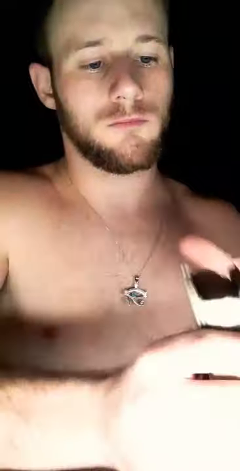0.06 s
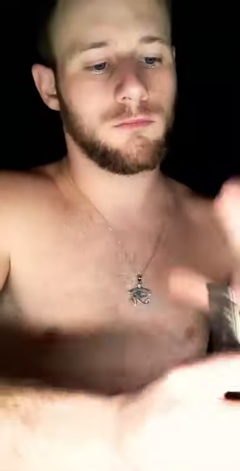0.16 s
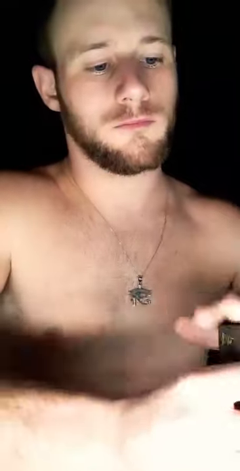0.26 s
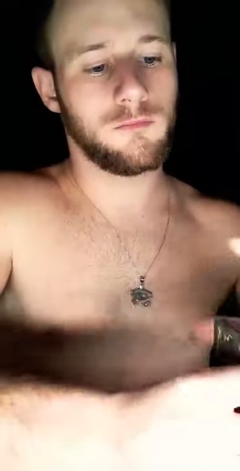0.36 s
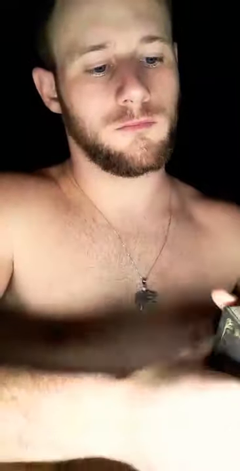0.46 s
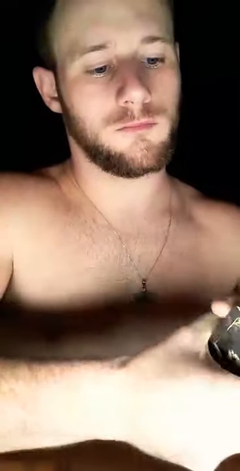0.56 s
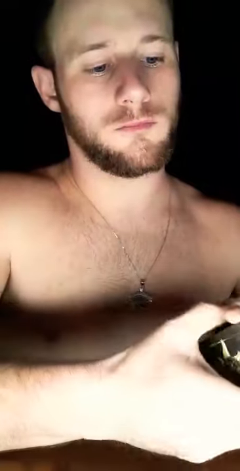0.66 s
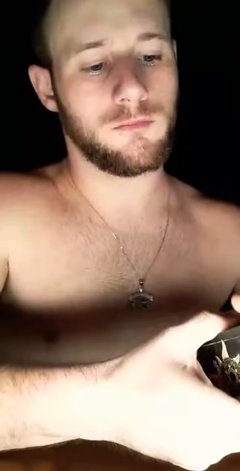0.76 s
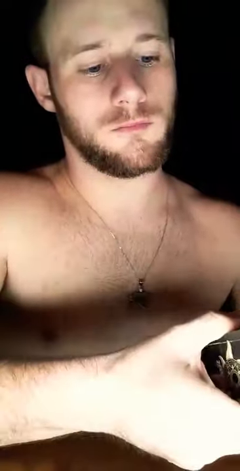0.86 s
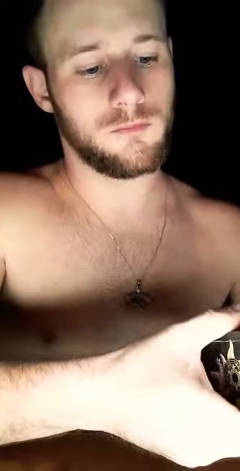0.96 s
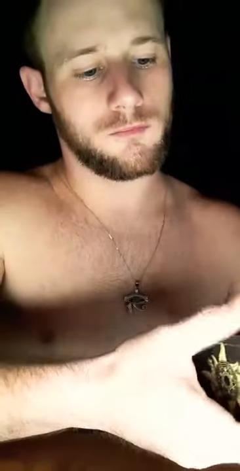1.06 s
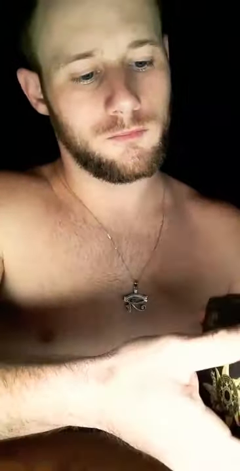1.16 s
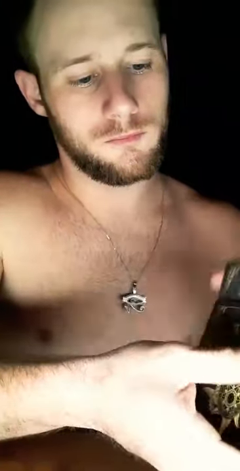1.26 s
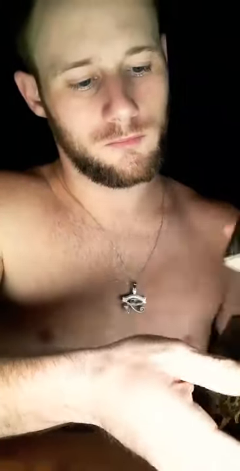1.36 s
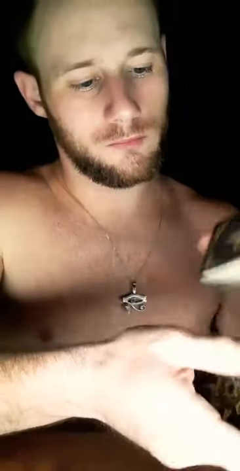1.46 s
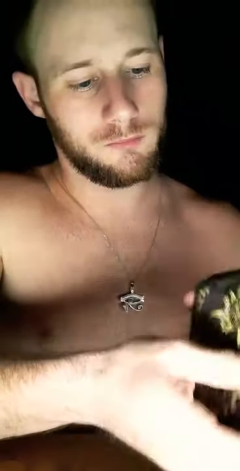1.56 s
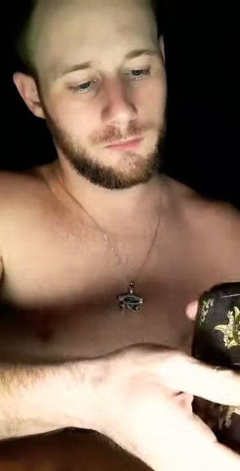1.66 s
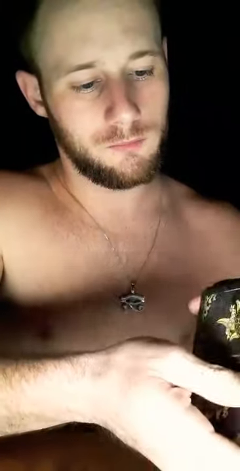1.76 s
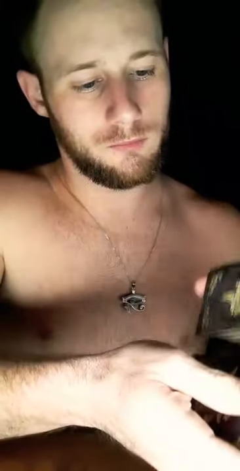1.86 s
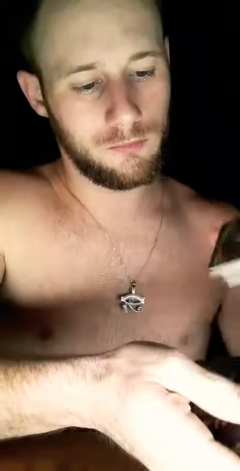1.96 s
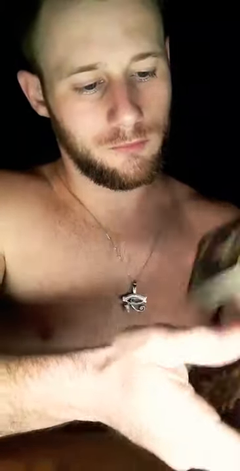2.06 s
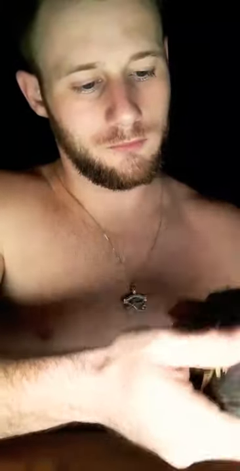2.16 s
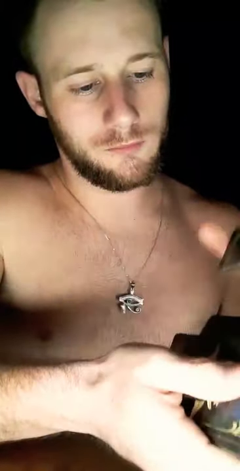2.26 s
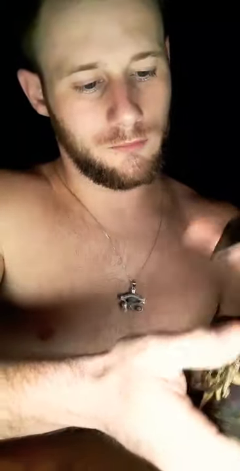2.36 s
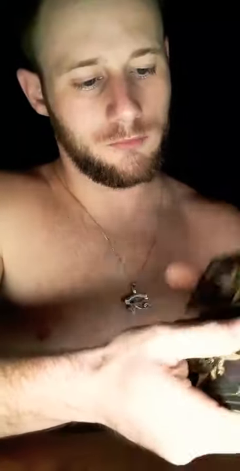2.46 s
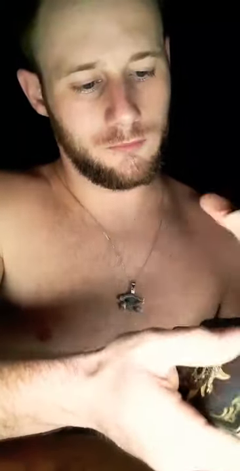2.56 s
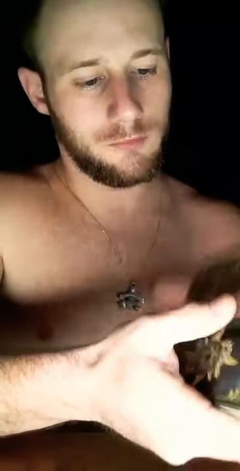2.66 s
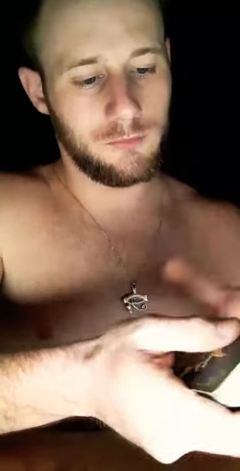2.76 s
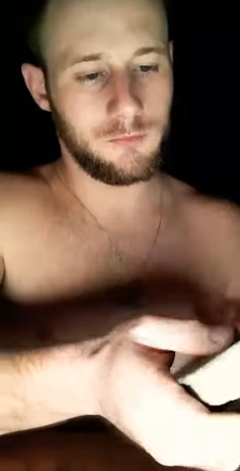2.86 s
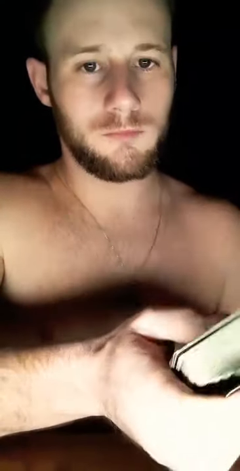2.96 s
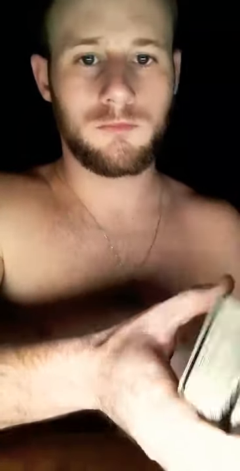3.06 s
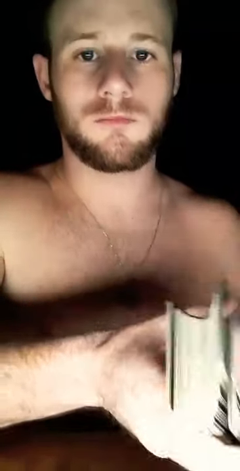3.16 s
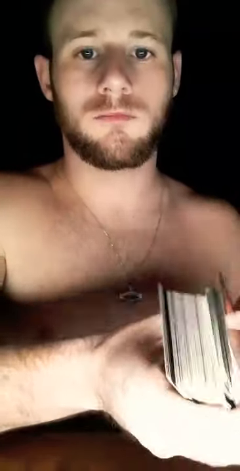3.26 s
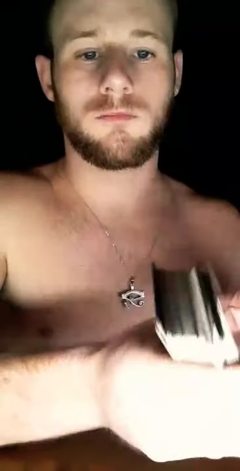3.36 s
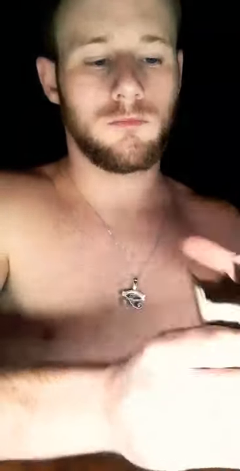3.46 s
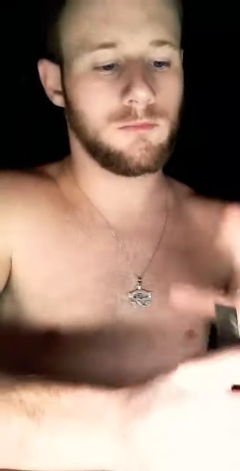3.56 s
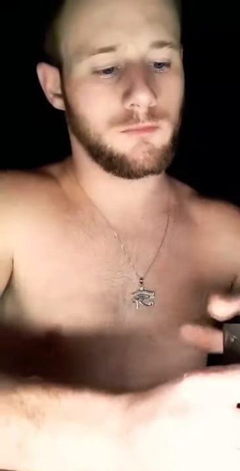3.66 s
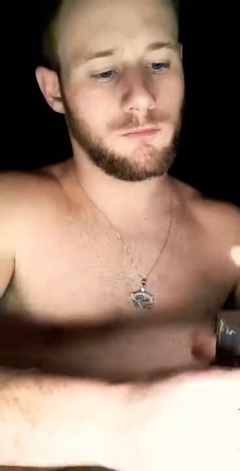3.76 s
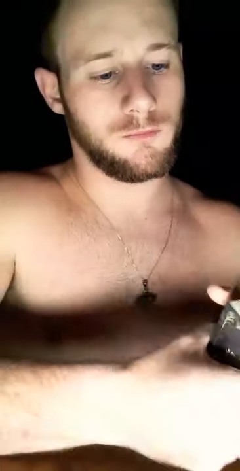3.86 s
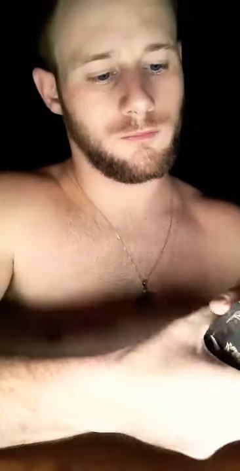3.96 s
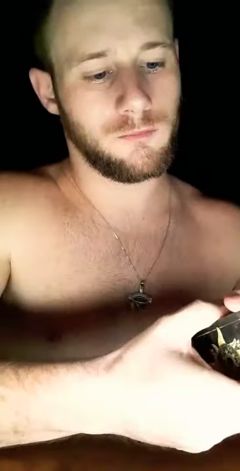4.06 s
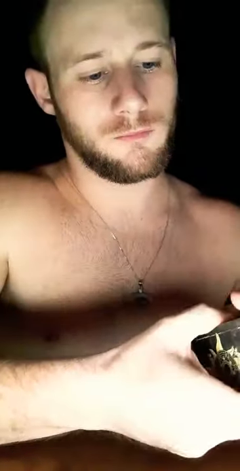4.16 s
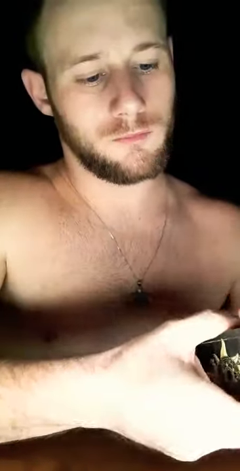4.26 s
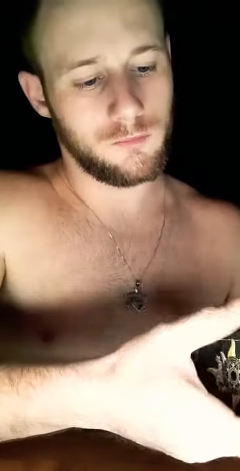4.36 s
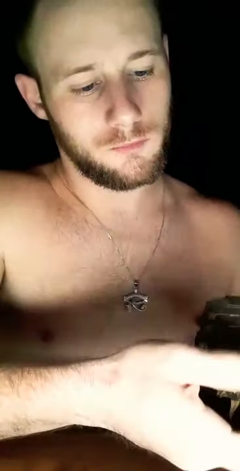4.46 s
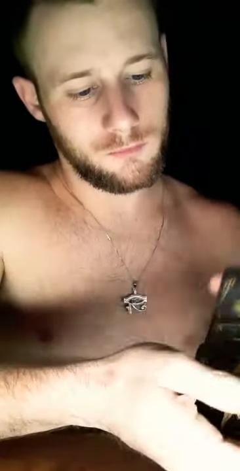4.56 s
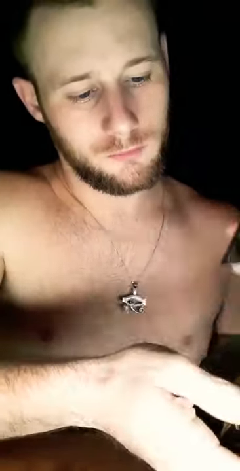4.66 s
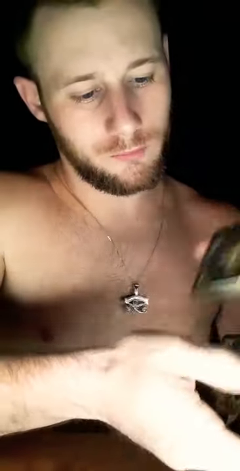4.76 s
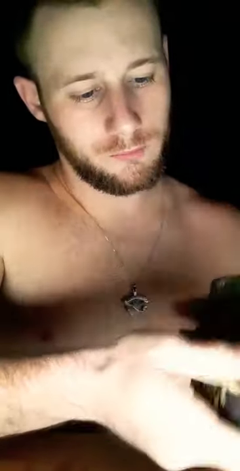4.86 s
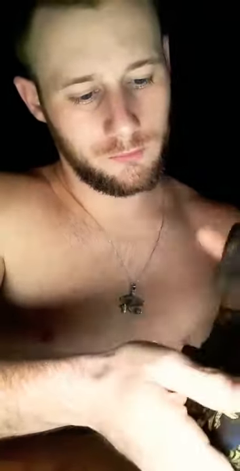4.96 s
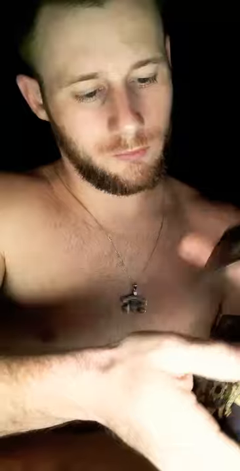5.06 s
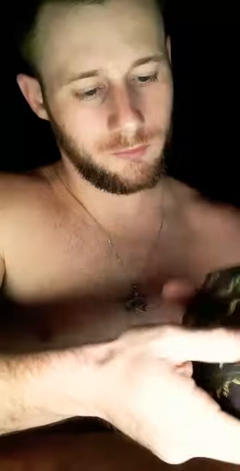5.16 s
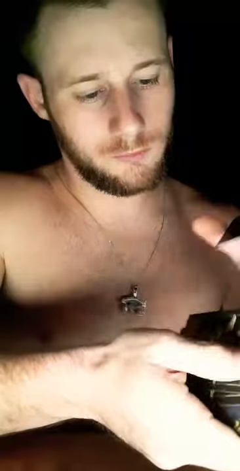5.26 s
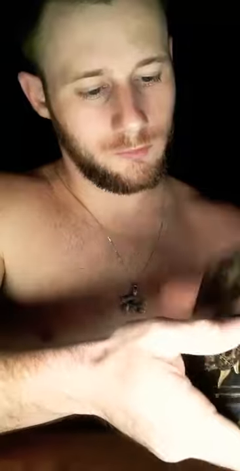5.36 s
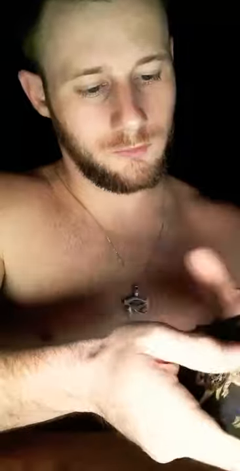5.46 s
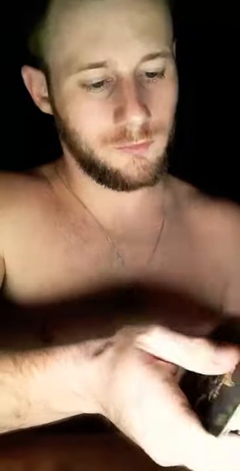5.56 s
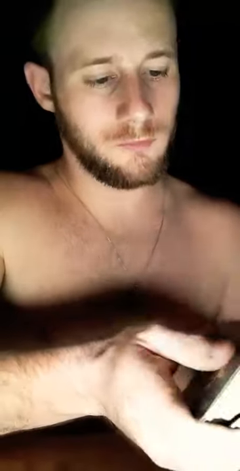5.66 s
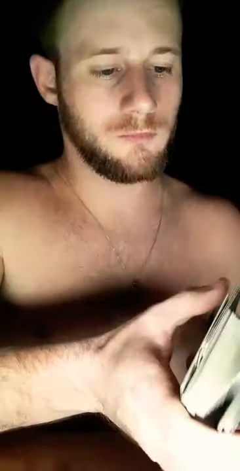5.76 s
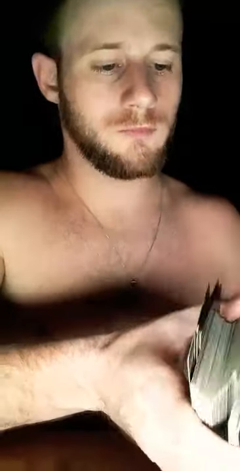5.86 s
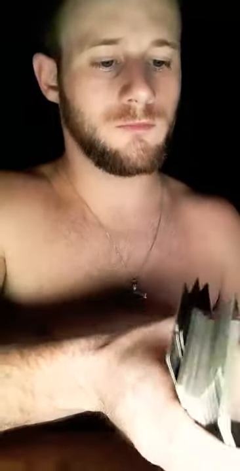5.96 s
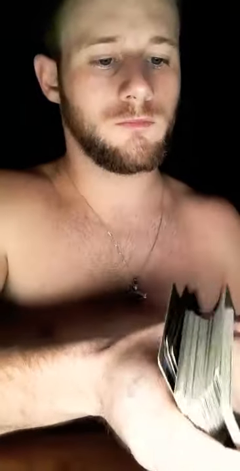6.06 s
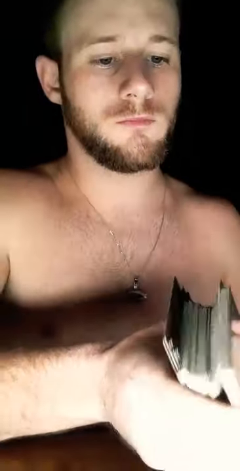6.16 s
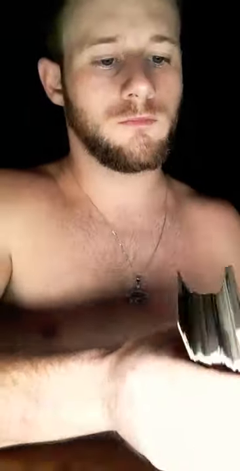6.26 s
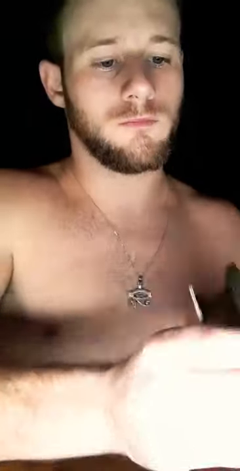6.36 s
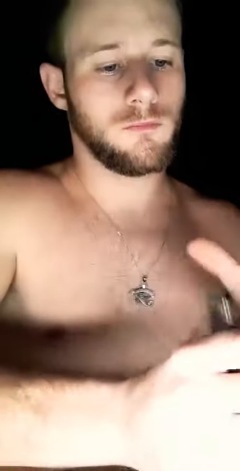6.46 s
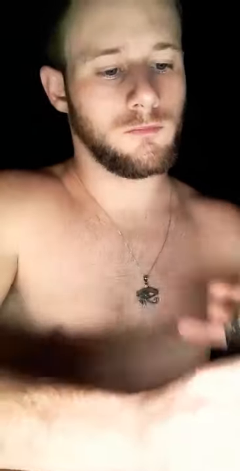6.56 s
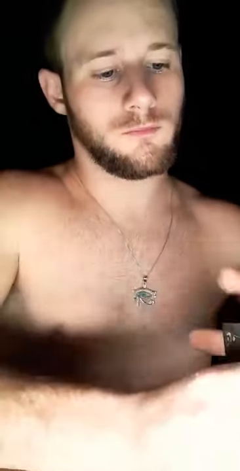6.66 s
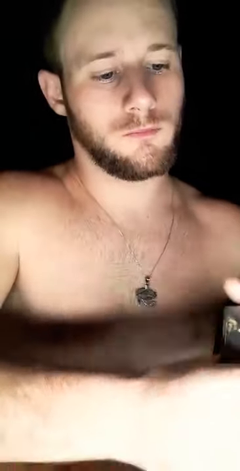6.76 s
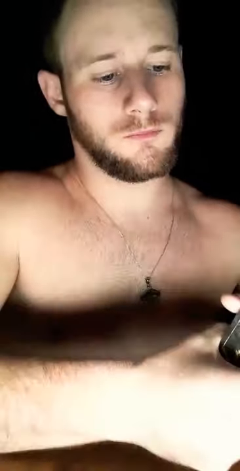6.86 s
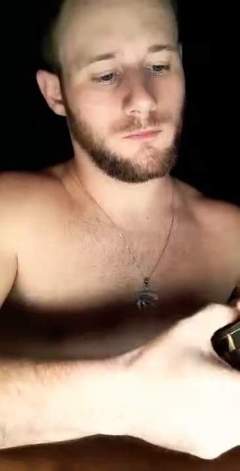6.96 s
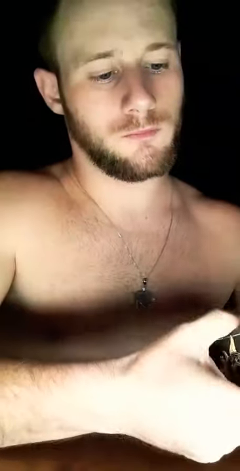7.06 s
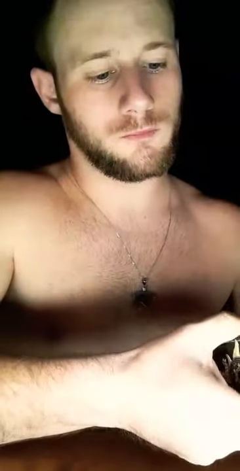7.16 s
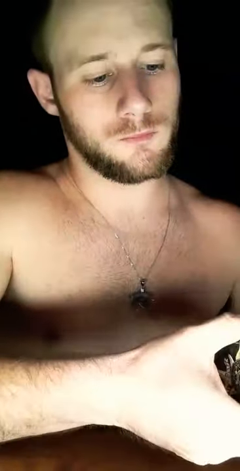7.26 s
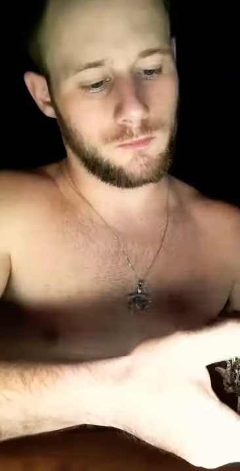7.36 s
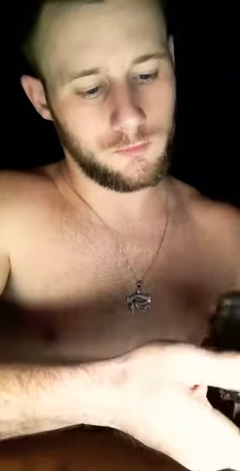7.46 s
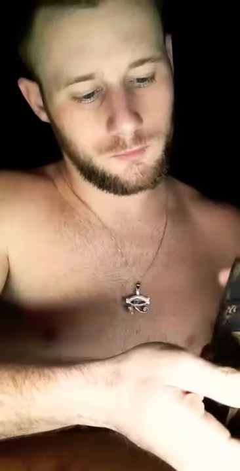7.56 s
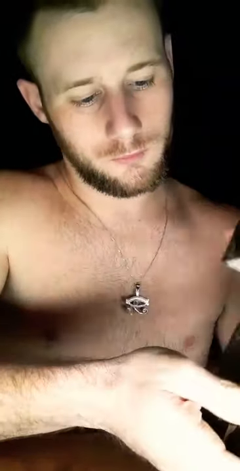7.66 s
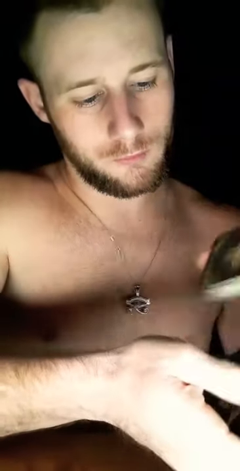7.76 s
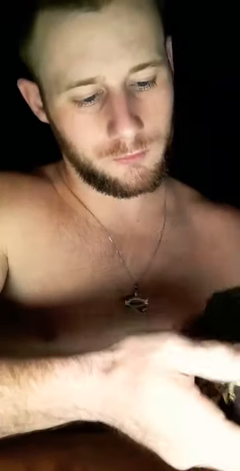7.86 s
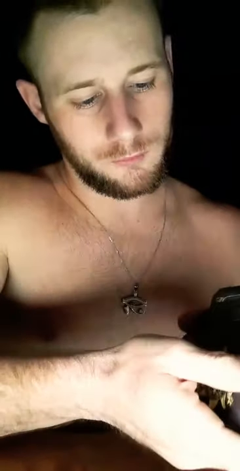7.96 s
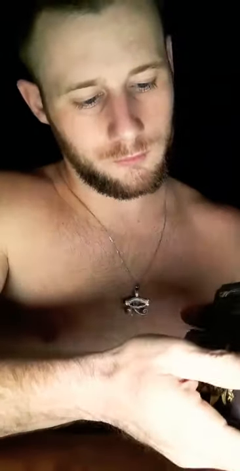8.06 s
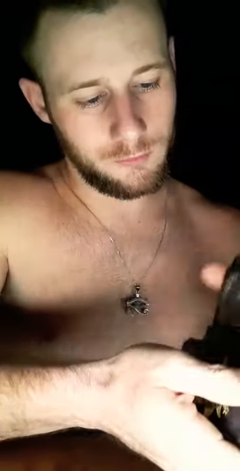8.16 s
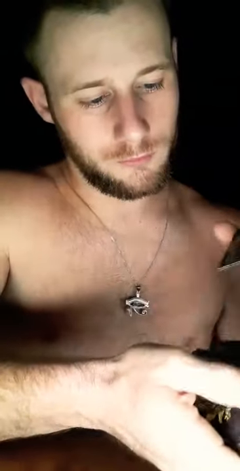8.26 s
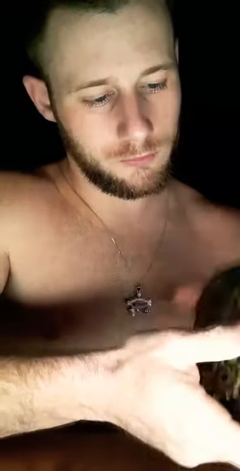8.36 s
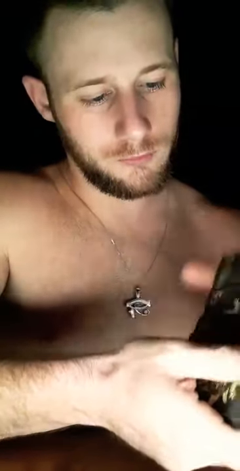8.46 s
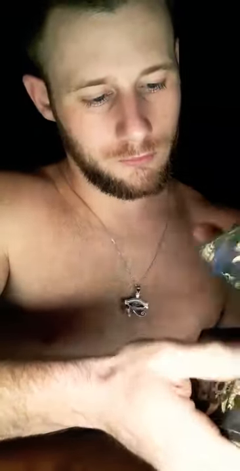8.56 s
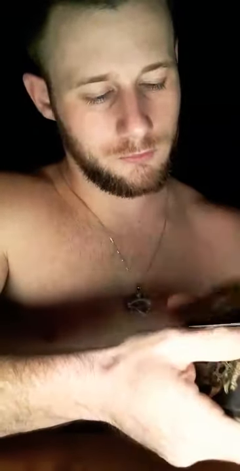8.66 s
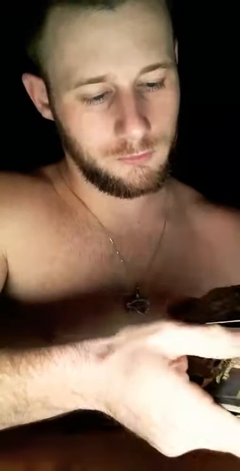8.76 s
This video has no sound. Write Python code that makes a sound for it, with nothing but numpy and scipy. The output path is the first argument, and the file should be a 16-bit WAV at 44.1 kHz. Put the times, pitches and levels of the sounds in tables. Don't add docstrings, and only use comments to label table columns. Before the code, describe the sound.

Overhand card shuffling at a table, dry and close. Clusters of rapid woody raps square the deck near the start, middle and later part; between them packets drop with soft clacks, card faces swish and loose rims tick and rattle. The last drop is bright and snappy. Short room echo, quiet unsteady fan wash.

```python
import sys
import numpy as np
from scipy import signal
from scipy.fft import rfft, irfft, next_fast_len
from scipy.io import wavfile
from scipy.ndimage import uniform_filter1d, minimum_filter1d

SR = 44100
rng = np.random.default_rng(int(sys.argv[2]) if len(sys.argv) > 2 else 0)


def store_pcm(level_fs):
    pcm = np.round(np.clip(level_fs, -1, 1) * 32767).astype(np.int16)
    wavfile.write(sys.argv[1], SR, np.atleast_2d(pcm).T)


def invert_db(x):
    u = np.asarray(x, float) / 20
    return 10 ** u


N = 388521


def evened(x):
    return x / np.sqrt(np.mean(x ** 2) + 1e-20)


def read(points, hz):
    f, value = np.transpose(points)
    return np.interp(np.log(hz + 1), np.log(f + 1), value)


def add(mix, s, sound):
    part = mix[round(s * SR):][:len(sound)]
    part += sound[:len(part)]


def ring(x, hz, width_hz):
    pole = np.exp((2j * np.pi * hz - np.pi * width_hz) / SR)
    return 2 * signal.lfilter([1 - abs(pole)], [1, -pole], x).real


def coloured(x, points):
    size = next_fast_len(len(x))
    gain = invert_db(read(points, np.fft.rfftfreq(size, 1 / SR)))
    return evened(irfft(rfft(x, size) * gain, size)[:len(x)])


def drift(seconds):
    span = max(round(seconds * SR), 2)
    return evened(uniform_filter1d(uniform_filter1d(rng.standard_normal(N), span), span))


# f/Hz, density/dB per Hz
AIR_SPECTRUM = [(16, -42), (58, -11.5), (100, -10), (140, -10), (197, -8.5), (290, -12.5), (450, -15),
                (577, -20), (897, -13), (1060, -23.5), (2170, -26), (2750, -33), (3600, -43), (7500, -50),
                (14500, -46.5)]
# f/Hz, level/dB rms
MOTOR_LINES = [(107, -67.2), (231.5, -79.5), (398.4, -78), (452.2, -92.5), (872.1, -82), (931.3, -79)]
# t/s, level/dB
BACKGROUND = [(0.0, -61), (0.19, -59.5), (0.42, -66), (1.23, -68), (1.67, -64), (2.21, -59.5), (3.21, -59),
              (3.58, -61), (3.88, -66), (4.51, -68.5), (5.15, -63), (5.52, -59.5), (6.45, -59.5),
              (6.67, -54.5), (6.82, -65.5), (7.6, -65.5), (8.1, -60.5), (8.81, -57.5)]


def fan(waver=0.0043, throb_db=2.2, swell_db=1.1):
    air_db, rest_db = -64, -67
    wash = coloured(rng.standard_normal(N), AIR_SPECTRUM) * invert_db(air_db + swell_db * drift(0.024))
    turns = np.cumsum(1 + waver * drift(0.033)) / SR
    lines = np.zeros(N)
    for hz, db in MOTOR_LINES:
        lines += np.sqrt(2) * invert_db(db + throb_db * drift(0.03)) * np.sin(2 * np.pi * hz * turns)
    gain_db = np.interp(np.arange(N) / SR, *np.transpose(BACKGROUND)) - rest_db
    return (wash + lines) * invert_db(gain_db)


def rub(catches_per_s, catch_db, grainy, flutter_db):
    smooth, sign = rng.standard_normal(N), np.sign(rng.standard_normal(N))
    size, caught = rng.exponential(1, N), rng.random(N) < catches_per_s / SR
    catches = evened(sign * invert_db(catch_db * np.minimum(size, 5)) * caught)
    return (smooth + grainy * catches) * invert_db(flutter_db * drift(0.0018))


# start t/s, rise/s, hold/s, hiss level/dB, deck body minus hiss/dB
STROKES = [(1.52, 0.0072, .001, -32.5, 4), (2.1125, 0.009, 0.065, -41.5, -1),
           (2.411, 0.0041, .001, -27.5, -0.5), (2.672, 0.028, 0.009, -50, 7), (2.87, 0.035, .001, -52.5, 2),
           (2.944, 0.012, 0.027, -55, 8.5), (3.053, 0.019, 0.018, -61, -4), (3.221, 0.03, 0.012, -55.5, -1),
           (4.7965, .003, 0.14, -44, -1.5), (5.096, 0.013, 0.038, -52.5, 2.5),
           (5.369, .018, .001, -41.5, 1), (5.586, .002, 0.013, -50, -0.5), (5.665, 0.057, .01, -52, 5.5),
           (5.764, .028, 0.064, -51, 5), (5.888, 0.017, .04, -57.5, 5), (6.05, 0.027, 0.07, -57, 3),
           (7.601, 0.0016, 0.0093, -65, 13), (7.8205, .002, 0.026, -43.5, 10),
           (7.845, 0.035, 0.055, -44, 8), (8.38, .03, 0.0044, -41, 1), (8.435, 0.017, 0.054, -49, -4.5),
           (8.5592, 0.0014, .001, -39.5, 10)]
# start t/s, rise/s, hold/s, hiss level/dB, deck body minus hiss/dB
JOLTS = [(0.182, 0.0014, 0.0011, -55.5, 19.5), (0.196, 0.0032, 0.00093, -46.5, 16),
         (0.215, .004, .001, -45.5, 19.5), (0.2295, 0.0017, 0.0025, -34, 13),
         (3.541, .002, .001, -59, 29.5), (3.5635, .002, .008, -50, 26), (3.6035, 0.00065, 0.008, -31.5, 12),
         (6.4948, .003, 0.059, -62, 33.5), (6.585, 0.0011, .001, -46, 25), (8.6405, .009, .001, -25, 4.5),
         (8.6275, .002, .001, -40, 2)]
# middle t/s, half length/s, hiss level/dB, deck body minus hiss/dB
BRUSHES = [(.082, 0.027, -78, -4), (0.51, 0.087, -72.5, 4), (.69, .12, -72, 1), (1.206, 0.059, -65, 2.5),
           (1.276, 0.045, -63.5, 1), (2.06, .05, -72.5, 8), (2.65, .03, -71.5, -13), (5.338, 0.027, -71, 0),
           (7.812, .04, -67.5, 10.5), (1.35, .06, -74, 5), (1.515, 0.043, -66.5, 8),
           (1.709, 0.099, -68, 10), (1.842, 0.069, -60.5, 5.5), (3.882, 0.053, -69, 2.5),
           (4.005, 0.091, -73, -0.5), (4.196, 0.09, -78.5, 9.5), (4.528, 0.058, -57.5, -5.5),
           (6.257, 0.074, -61, -1.5), (6.832, 0.052, -68, 3), (6.945, 0.076, -69, 3.5),
           (7.092, .12, -73, 7), (7.53, 0.11, -66, 1), (8.143, 0.12, -59.5, 2.5), (8.78, 0.11, -57, 10)]
# hiss/dB, deck body/dB
GRIP_DB = [-19.5, -9]
# hiss/(dB/s), deck body/(dB/s)
FALL_DB_PER_S = [425.5, 310]
# (hiss/dB, deck body/dB), creep/(dB/s)
LINGER_DB, LINGER_DB_PER_S = [33.5, 29.5], 167


def stroke_level(layer):
    rise_db, sag_db_per_s, brush_depth_db = 12.5, 72.5, 17.5
    t = np.arange(N) / SR
    level = np.interp(t, *np.transpose(BACKGROUND)) + GRIP_DB[layer] + 1.3 * drift(0.099)
    linger = LINGER_DB[layer]
    for s, rise, hold, db, body_db in STROKES + JOLTS:
        span = slice(round(s * SR), round(s * SR) + SR // 2)
        top = s + rise
        held = top + hold
        knee = held + linger / FALL_DB_PER_S[layer]
        sag = sag_db_per_s * hold
        drop = np.interp(t[span], [s, top, held, knee, knee + 1],
                         [rise_db, 0, sag, sag + linger, sag + linger + LINGER_DB_PER_S])
        level[span] = np.maximum(level[span], db + layer * body_db - drop)
    for s, half, db, body_db in BRUSHES:
        swell = db + layer * body_db - brush_depth_db * ((t - s) / half) ** 2
        level = np.maximum(level, swell)
    return level


def patchy(x, colours, depth_db, patch_s):
    rings = sum(invert_db(db + depth_db * drift(patch_s)) * ring(x, hz, width) for hz, width, db in colours)
    return evened(x + rings)


# f/Hz, density/dB per Hz
HISS_SPECTRUM = [(1760, -45.5), (3000, -16), (4950, -8), (5390, -9.5), (5720, -14), (9450, -7.5),
                 (13200, -5.5), (14100, -3.5), (14500, -7.5)]
# f/Hz, density/dB per Hz
BODY_SPECTRUM = [(120, -35.5), (200, -11.5), (402, -14), (670, -6), (1270, -7.5), (1450, -4), (1980, -8),
                 (2860, -11), (3120, -8), (3650, -13.5), (6000, -23), (7800, -56.5), (13200, -120)]
# f/Hz, width/Hz, level/dB
SHEEN = [(5400, 900, 0), (7600, 1200, -2), (9400, 1200, 1), (12000, 1800, -2)]
# f/Hz, width/Hz, level/dB
HOLLOW = [(1740, 170, 3.5), (2030, 170, 6), (2350, 250, 1), (3150, 250, -2), (4600, 400, 2)]


def slides(body_db=-3, patchy_db=3.5):
    loudest_db = -23
    fine = coloured(rub(1800, 3.4, 0.55, 2.2), HISS_SPECTRUM)
    coarse = coloured(rub(900, 1.3, 0.41, 1.8), BODY_SPECTRUM)
    hiss_level = np.minimum(stroke_level(layer=0), loudest_db + 2.5)
    body_level = np.minimum(stroke_level(layer=1) + body_db, loudest_db)
    hiss = patchy(fine, SHEEN, patchy_db, 0.025) * invert_db(hiss_level)
    body = patchy(coarse, HOLLOW, patchy_db, 0.02) * invert_db(body_level)
    return hiss + body


# t/s, peak level/dB, f/Hz, t60/s
THUDS = [(0.19, -24.5, 173, 0.087), (0.2, -18, 850, 0.041), (0.2122, -11.5, 410, 0.04),
         (.1835, -21, 520, .02), (0.38, -46.5, 397, 0.069), (3.5423, -22, 171, 0.11),
         (3.56, -21.5, 174.6, 0.13), (3.562, -15, 400, 0.035), (3.6038, 16, 190, 0.0055),
         (3.548, -22, 400, .03), (5.8722, -19, 447, 0.02), (5.873, -29, 610, .04), (5.874, -29, 290, .05),
         (5.873, -32, 1387, 0.025), (5.872, -29, 850, 0.045), (7.603, -38.5, 749, 0.023),
         (5.878, -25.5, 162.4, 0.068), (6.502, -17, 380, 0.02), (6.512, -19, 340, 0.04),
         (6.507, -16, 174.3, .1), (6.594, -22.5, 152, 0.1), (8.5595, -30.5, 800, 0.029),
         (8.6415, -17, 520, 0.017), (8.642, -19, 720, .02), (8.649, -20, 800, .025), (8.653, -20, 480, .02),
         (1.313, -52, 700, .04), (8.648, -17, 474, 0.019)]
# t/s, peak level/dB, f/Hz, t60/s
MORE_THUDS = [(.375, -52, 85, .07), (.385, -52, 150, .06), (3.549, -25, 950, .03), (3.566, -24, 700, .04),
              (1.525, -40, 280, .04), (1.527, -37, 1010, .045), (5.372, -44, 1010, .045),
              (7.835, -36, 3280, .03), (8.562, -37, 3300, .025), (8.645, -41, 60, .07), (2.113, -42, 650, .04),
              (2.114, -46, 330, .05), (4.8, -46, 480, .05), (4.832, -42, 820, .03), (5.372, -40, 850, .04),
              (5.373, -44, 450, .04)]


def thuds(rise_turns=0.67):
    out, t = np.zeros(N), np.arange(SR // 4) / SR
    for s, db, hz, t60 in THUDS + MORE_THUDS:
        rise = 1 - np.exp(-(t * hz / rise_turns) ** 2)
        swing = rise * invert_db(db + 3.5 - 60 * t / t60) * np.sin(2 * np.pi * hz * t)
        add(out, s, signal.lfilter(*signal.butter(1, 0.3 * hz, "high", fs=SR), swing))
    return out


# t/s, peak level/dB, ring f/Hz, crisp edge share/dB
RAPS = [(.1861, -19.5, 1570, -34.5), (.1999, -14.5, 1600, -33.5), (.2035, -8, 1530, -38.5),
        (.2108, -11.5, 1658, -29.5), (.2134, -6, 2206, -28.5), (.2219, -13, 1830, -30),
        (.2311, -6.5, 2290, -23), (.2345, -7, 2160, -23.5), (.2366, -10, 1955, -27),
        (3.5424, -10, 1740, -52.5), (3.5464, -8, 2000, -53.5), (3.5633, -8, 2030, -37.5),
        (3.5674, -5.5, 2150, -29), (3.5717, -7.5, 1710, -31.5), (3.5761, -3, 2200, -39.5),
        (3.5845, -15, 2160, -23.5), (3.5878, -15.5, 2000, -37), (3.6047, -9, 2350, -17),
        (3.6188, -17, 2170, -17.5), (3.6261, -24, 1910, -15.5), (6.4957, -18.5, 1616, -46.5),
        (6.5039, -6, 1600, -57), (6.5078, -11, 1800, -41.5), (6.5144, -12.5, 1720, -36),
        (6.5205, -7.5, 1800, -46.5), (6.5378, -17, 1430, -36), (6.5419, -20, 1510, -36.5),
        (6.5532, -21, 1790, -40), (6.5757, -23, 1820, -35), (6.5866, -9, 2600, -39),
        (.1843, -24, 1150, -45), (.2157, -13, 1700, -35), (.2327, -8, 1800, -30), (3.5696, -9, 1900, -35),
        (3.6068, -15, 1500, -30), (6.5006, -21, 1500, -50), (6.5112, -15, 1700, -50),
        (6.5162, -15, 1600, -50)]
# t/s, peak level/dB, ring f/Hz, crisp edge share/dB
DROPS = [(1.3144, -43, 1750, -20), (1.5215, -27, 1950, -17), (1.5288, -18.5, 1944, -12),
         (2.1146, -24.5, 1720, -23), (2.137, -35, 2000, -1.5), (2.4163, -17, 1860, -6.5),
         (2.6883, -45, 1960, -5), (2.697, -41, 1860, -16), (2.956, -37.5, 1930, -19),
         (4.7993, -29, 1770, -19), (4.8034, -21, 1920, -15), (4.9407, -33, 1760, -35),
         (5.372, -34, 1250, -22), (5.3944, -43, 1490, -11), (5.7867, -39.5, 1640, -9),
         (5.8223, -42, 1900, -11), (5.8749, -25.5, 1288, -44), (6.0553, -39, 1930, -19),
         (7.6045, -33.5, 1802, -17), (7.823, -13, 1740, -14), (7.8936, -34, 1800, 3),
         (7.9257, -28.5, 1960, -7.5), (8.1795, -41, 1830, -12), (8.3918, -36.5, 2020, -7),
         (8.5612, -20.5, 1956, -14), (8.6297, -33, 2000, 0), (8.6445, -21, 2360, -15),
         (8.6509, -14, 2120, -5), (8.6536, -9, 1900, -6), (8.6602, -16, 1950, -22),
         (1.5315, -24, 2050, -20), (2.4195, -23, 2000, -15), (7.826, -22, 1750, -25),
         (7.841, -25, 1700, -25), (1.61, -44, 1750, -25)]
# t/s, peak level/dB, ring f/Hz, crisp edge share/dB
TICKS = [(0.1965, -31, 1590, -33), (0.2245, -17.5, 2080, -31.5), (1.29, -63, 2020, 7), (1.5, -52, 1900, -5),
         (1.601, -42, 1830, -15), (1.7804, -47, 2150, -16), (2.372, -45.5, 1497, -25),
         (2.9626, -37.5, 1777, -16), (3.5995, -26, 2120, -23), (5.159, -43, 1710, -8),
         (5.5923, -52.5, 2460, 0), (6.0813, -42, 2050, -7), (6.5238, -14, 1696, -43),
         (7.9051, -27, 1770, -12.5), (7.959, -33.5, 1710, -21), (8.1621, -43, 1655, -11),
         (8.6642, -12, 1800, -14.5), (6.5671, -25, 1400, -40), (5.8727, -38, 2600, -25)]
# t/s, peak level/dB, ring f/Hz, crisp edge share/dB
RATTLES = [(0.2399, -21.0, 2030.0, -35.0), (0.2562, -24.0, 1660.0, -36.0), (0.2705, -28.0, 1880.0, -31.0),
           (0.2756, -30.0, 1970.0, -40.0), (1.5387, -25.0, 1720.0, -22.0), (1.5467, -29.0, 1910.0, -29.0),
           (1.5535, -33.0, 2020.0, -29.0), (1.5648, -35.0, 1820.0, -27.0), (2.144, -36.0, 1930.0, -14.0),
           (2.1499, -37.0, 1790.0, -21.0), (2.1587, -41.0, 1980.0, -21.0), (2.1669, -46.0, 2050.0, -16.0),
           (2.4234, -26.0, 1880.0, -21.0), (2.4323, -29.0, 2180.0, -22.0), (2.4384, -30.0, 1930.0, -20.0),
           (2.4492, -34.0, 1670.0, -24.0), (3.6317, -21.0, 2000.0, -37.0), (3.6373, -26.0, 1920.0, -29.0),
           (3.6467, -29.0, 2020.0, -29.0), (3.6622, -31.0, 2110.0, -39.0), (4.8111, -29.0, 1740.0, -32.0),
           (4.8213, -34.0, 1900.0, -26.0), (4.8323, -35.0, 1770.0, -22.0), (4.8466, -38.0, 2080.0, -30.0),
           (5.8335, -42.0, 1800.0, -25.0), (5.8429, -47.0, 1700.0, -25.0), (5.8609, -44.0, 1620.0, -25.0),
           (5.8672, -46.0, 1630.0, -31.0), (6.5297, -21.0, 1720.0, -53.0), (6.5453, -25.0, 1540.0, -50.0),
           (6.5581, -31.0, 2220.0, -42.0), (6.5627, -31.0, 1620.0, -43.0), (6.5942, -20.0, 1740.0, -53.0),
           (6.5999, -23.0, 1960.0, -37.0), (6.6048, -27.0, 1990.0, -41.0), (6.6152, -26.0, 2540.0, -45.0),
           (7.8337, -24.0, 1650.0, -30.0), (7.8466, -30.0, 1710.0, -28.0), (7.9108, -34.0, 1640.0, -25.0),
           (7.9164, -34.0, 1810.0, -30.0), (7.9338, -36.0, 1920.0, -29.0), (7.9423, -37.0, 1860.0, -30.0),
           (8.4025, -39.0, 2200.0, -20.0), (8.4189, -40.0, 1930.0, -20.0), (8.5663, -29.0, 2120.0, -31.0),
           (8.5729, -31.0, 1840.0, -30.0), (8.6683, -18.0, 2020.0, -28.0), (8.675, -22.0, 1960.0, -30.0),
           (8.6815, -25.0, 1890.0, -26.0), (8.696, -29.0, 1850.0, -28.0)]
# f/Hz, width/Hz, level/dB
WOOD_MODES = [(400, 200, -7), (677, 200, -4), (964, 310, 0), (1353.4, 220, 2.5)]


def taps(scrape_s=0.0008, snap=2.8, width_hz=520, upper_db=-14, harder_db=22, table_db=-14,
         edge_s=0.00048, after_db=-12, after_s=0.0054):
    stiff_hz, blunt_hz = 4050, 2950
    out, t = np.zeros(N), np.arange(1500) / SR
    rim = signal.butter(2, 5000, "high", fs=SR)
    soft = signal.butter(6, [300, 5600], "band", fs=SR, output="sos")
    blunt = signal.butter(4, blunt_hz, fs=SR, output="sos")
    settling = invert_db(after_db) * np.exp(-t / after_s) * (1 - np.exp(-t / 0.0006))
    scrape_shape = (t / scrape_s) * np.exp(1 - t / scrape_s)
    snap_pulse = snap * np.exp(-((t - scrape_s) / 0.00006) ** 2)
    edge_shape = (t / edge_s) * np.exp(1 - t / edge_s)
    rows = RAPS + DROPS + TICKS + [tuple(row) for row in RATTLES]
    chance = rng.standard_normal((len(rows), 2, len(t)))
    for (s, db, hz, edge_db), (rough, grit) in zip(rows, chance):
        scrape = rough * scrape_shape - snap_pulse
        first, later = signal.sosfilt(soft, [scrape, rough * settling])
        blow = first + later
        packet = signal.sosfilt(blunt, ring(ring(blow, hz, width_hz), hz, 2 * width_hz))
        upper = ring(ring(first + 0.55 * later, stiff_hz, 2400), stiff_hz, 3000)
        wood = sum(invert_db(d) * ring(ring(blow, f, w), f, 1.9 * w) for f, w, d in WOOD_MODES)
        crisp = signal.lfilter(*rim, grit) * (edge_shape + settling)
        bright_db = upper_db + harder_db * np.log2(hz / 1900) + 0.52 * min(edge_db + 28.5, 0)
        wood_db = table_db - 0.4 * (edge_db + 27)
        parts = [(packet, 1.2), (upper, bright_db), (wood, wood_db), (crisp, edge_db + 8)]
        tap = sum(invert_db(d) * p / abs(p).max() for p, d in parts)
        peak_s = abs(packet[:110]).argmax() / SR
        add(out, s - peak_s, invert_db(db) * tap)
    return out


# t/s, peak level/dB, centre f/Hz, width/Hz
CRACKS = [(.2134, -14, 4800, 2500), (.2311, -8, 4500, 2500), (.2352, -14, 4500, 2500),
          (3.5845, -22, 5000, 3000), (.2035, -25, 4300, 2500), (.2105, -22, 4500, 2500),
          (.2205, -22, 4000, 2500), (3.5678, -22, 4300, 2500), (3.572, -22, 4500, 2500),
          (3.579, -21, 4200, 2500), (3.6041, -4.5, 4300, 4000), (3.6052, -8, 3800, 4000),
          (4.8032, -33, 4200, 1500), (4.9405, -42, 3500, 3000), (5.372, -31, 2500, 4000),
          (5.8728, -30, 2600, 2500), (6.5866, -9, 3600, 3000), (7.823, -24, 3600, 2500),
          (8.5605, -25, 3200, 2500), (8.6297, -20, 9300, 2500), (8.6302, -28, 4800, 1500),
          (8.6415, -25, 7500, 2000), (8.662, -20, 3200, 2500), (8.6434, -10, 2300, 2500),
          (8.65, -9, 2600, 3000), (8.6535, -13, 3300, 3500)]


def cracks(burst_s=0.0003, scatter_s=0.006, scatter_db=-17, reach=0.65):
    out, t = np.zeros(N), np.arange(1200) / SR
    shape = 0.5 * np.exp(-t / burst_s) + invert_db(scatter_db) * np.exp(-t / scatter_s)
    click = 2 * (t == 0)
    for (s, db, hz, width), grit in zip(CRACKS, rng.standard_normal((len(CRACKS), len(t)))):
        burst = grit * shape - click
        top = signal.butter(5, hz + reach * width, fs=SR, output="sos")
        crack = signal.sosfilt(top, ring(ring(burst, hz, width), hz, width))
        peak_s = abs(crack[:60]).argmax() / SR
        add(out, s - peak_s, invert_db(db) * crack / abs(crack).max())
    return out


# t/s, level/dB, first f/Hz, last f/Hz, sag/s, t60/s
THUMP = (3.6052, -17.5, 110, 42, .011, .17)


def thump():
    out, t = np.zeros(N), np.arange(SR // 4) / SR
    s, db, first_hz, last_hz, sag_s, t60 = THUMP
    turns = np.cumsum(last_hz + (first_hz - last_hz) * np.exp(-t / sag_s)) / SR
    add(out, s, -invert_db(db - 60 * t / t60) * np.sin(2 * np.pi * turns))
    return out


# f/Hz, t60/s
ROOM_T60 = [(150, 0.31), (500, 0.28), (2000, 0.18), (6000, 0.13), (14000, 0.22)]


def room(x):
    echoes = np.zeros(SR // 2)
    at = np.arange(200, len(echoes) - 12, 12)
    echoes[at + rng.integers(0, 12, len(at))] = rng.choice([-1., 1.], len(at))
    hz, t, z = signal.stft(echoes, SR, nperseg=256)
    decay = invert_db(-60 * t / read(ROOM_T60, hz)[:, None])
    tail = signal.istft(z * decay, SR, nperseg=256)[1]
    return signal.fftconvolve(x, tail / np.linalg.norm(tail))[:N]


def scene():
    room_db = -12
    air = fan()
    cards = slides() + thuds() + taps() + cracks()
    return (cards + thump() + invert_db(room_db) * room(cards) + air)[None]


def top_cut(x):
    return signal.sosfilt(signal.butter(12, 15260, fs=SR, output="sos"), x)


def record(dry):
    edge_hz, ceiling = 14000, 0.72
    lowpass = signal.firwin(255, edge_hz, window=("kaiser", 7), fs=SR)
    band = signal.oaconvolve(dry, lowpass[None], "same")
    gain = minimum_filter1d(ceiling / np.maximum(abs(band), ceiling), size=61)
    held = band * uniform_filter1d(gain, size=61)
    return top_cut(held)


dry = scene()
out = record(dry)
store_pcm(out)
```